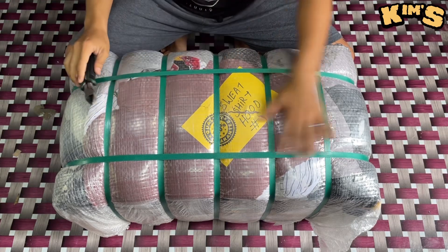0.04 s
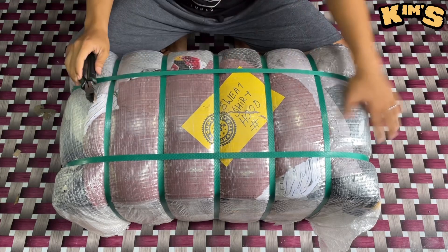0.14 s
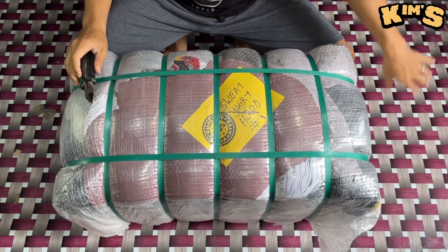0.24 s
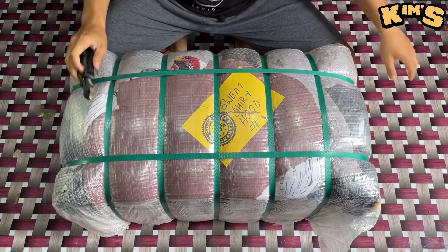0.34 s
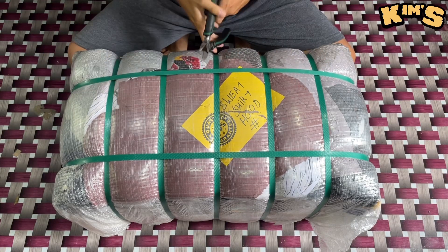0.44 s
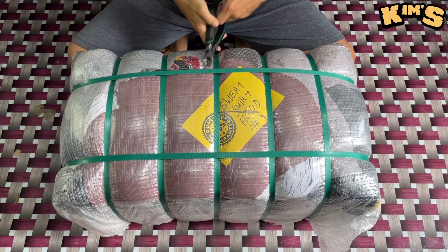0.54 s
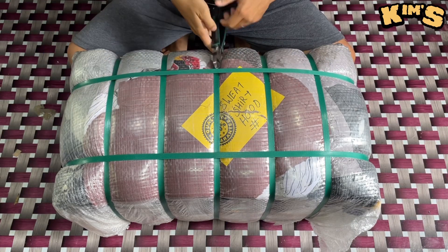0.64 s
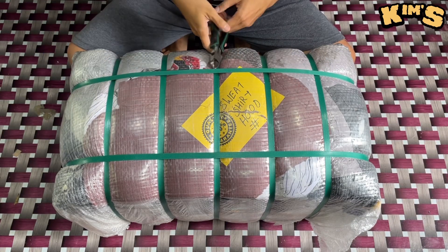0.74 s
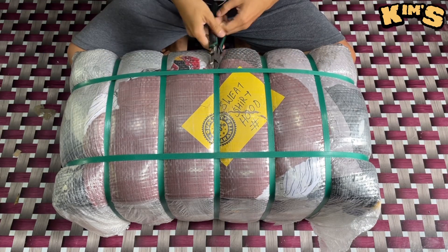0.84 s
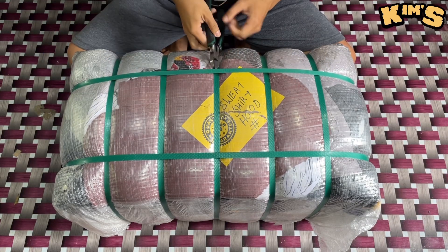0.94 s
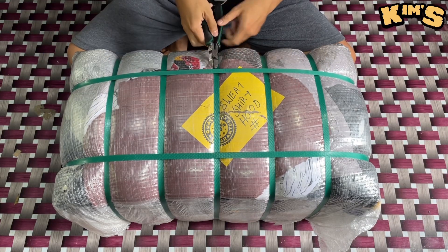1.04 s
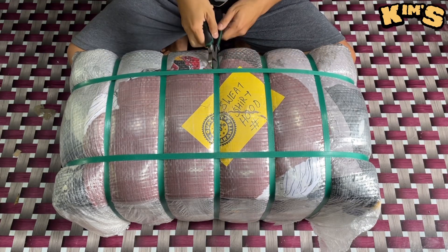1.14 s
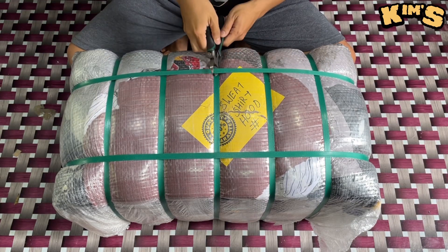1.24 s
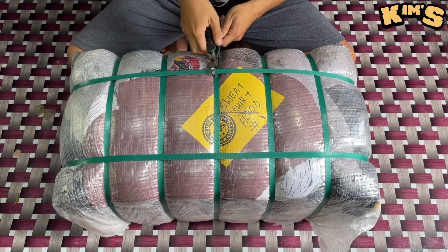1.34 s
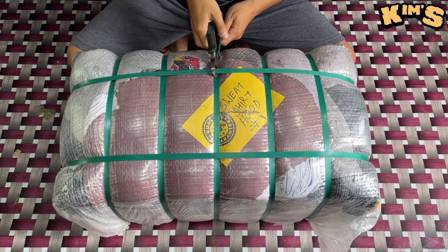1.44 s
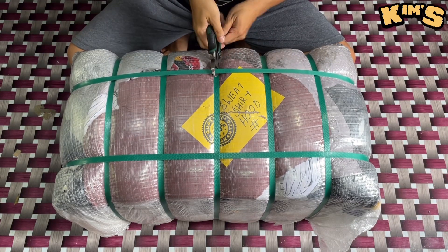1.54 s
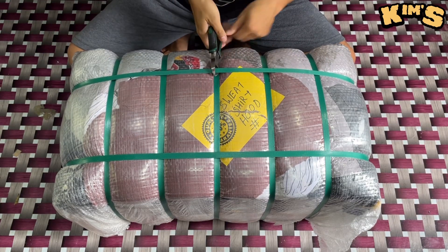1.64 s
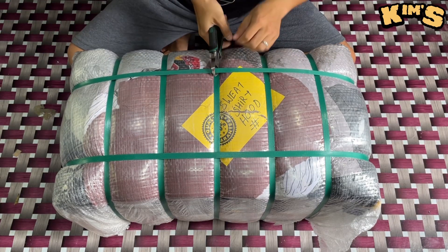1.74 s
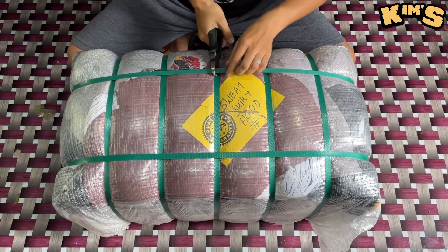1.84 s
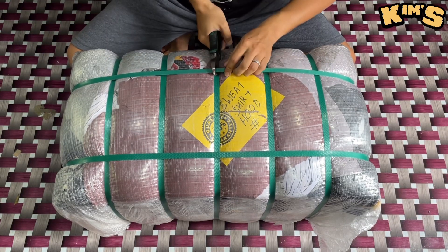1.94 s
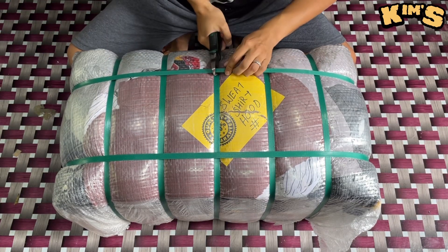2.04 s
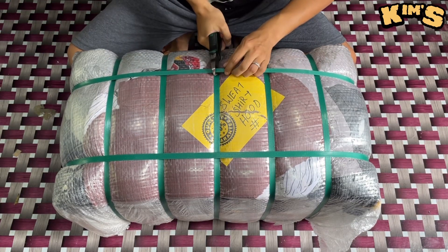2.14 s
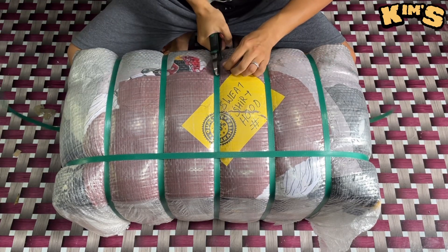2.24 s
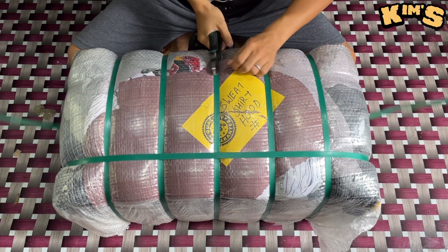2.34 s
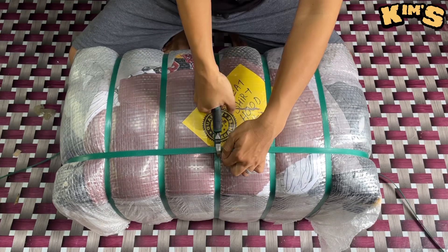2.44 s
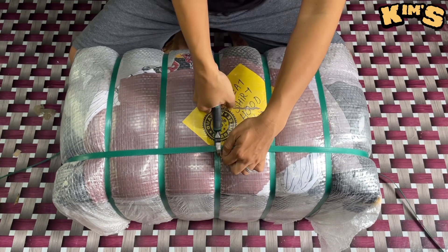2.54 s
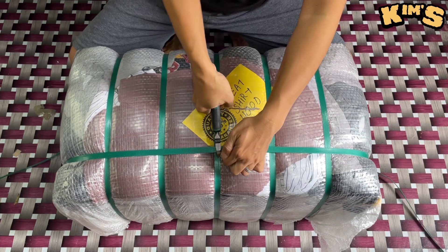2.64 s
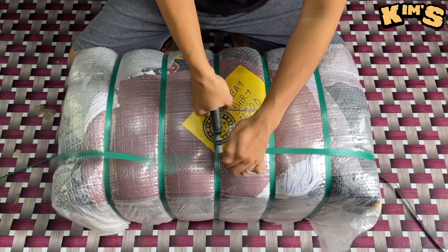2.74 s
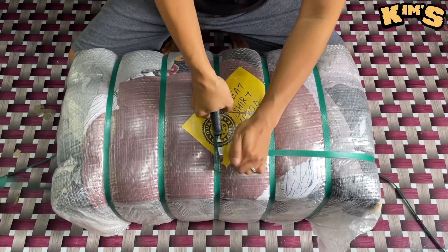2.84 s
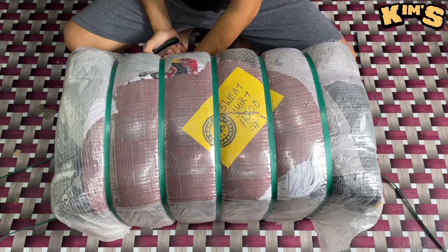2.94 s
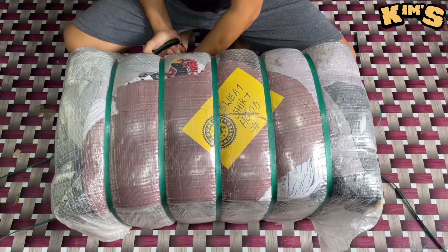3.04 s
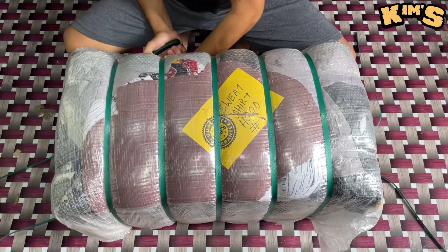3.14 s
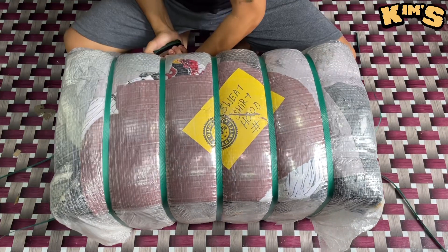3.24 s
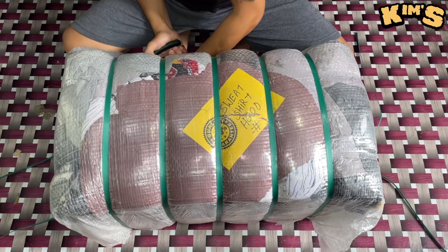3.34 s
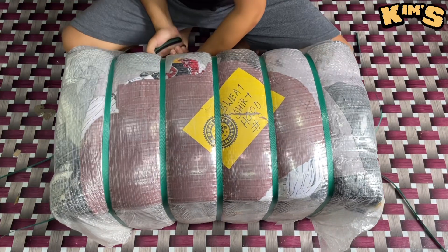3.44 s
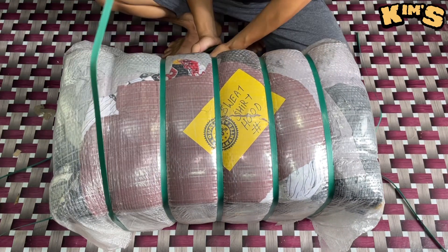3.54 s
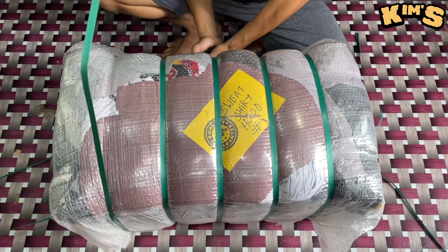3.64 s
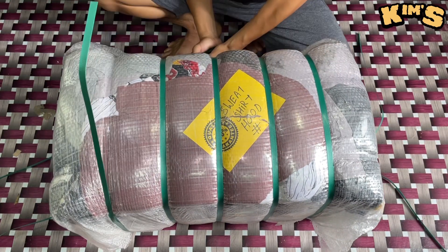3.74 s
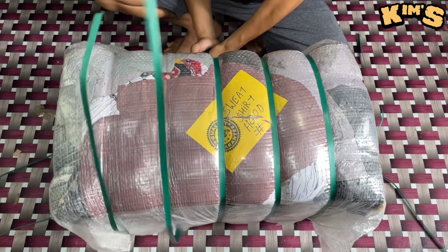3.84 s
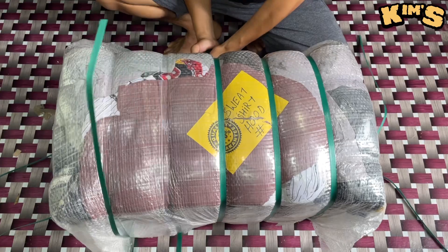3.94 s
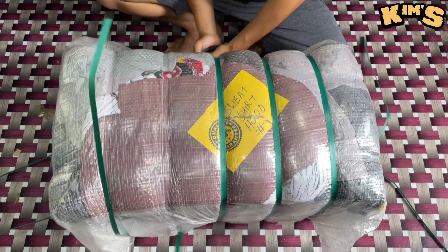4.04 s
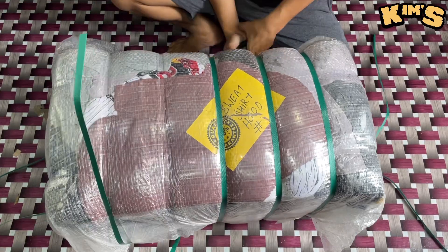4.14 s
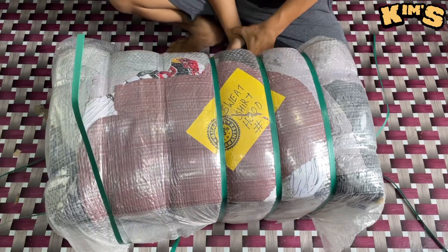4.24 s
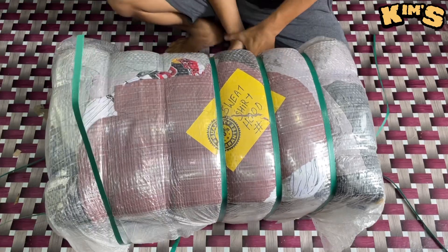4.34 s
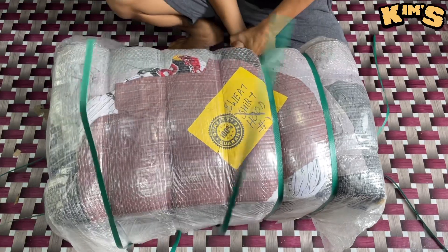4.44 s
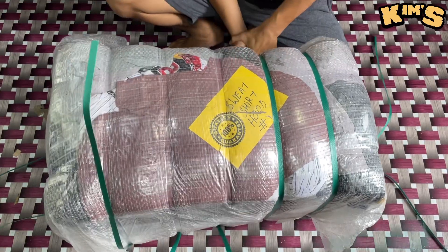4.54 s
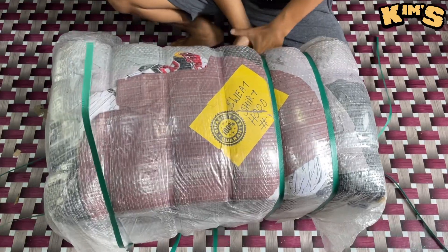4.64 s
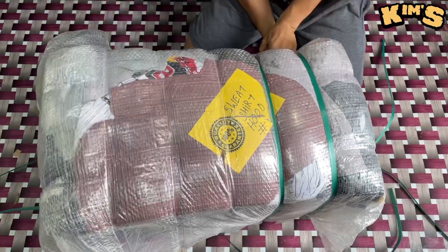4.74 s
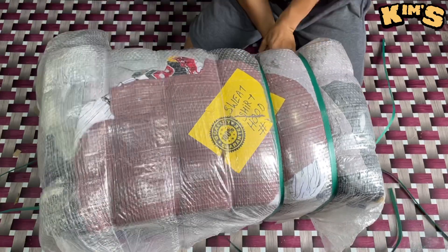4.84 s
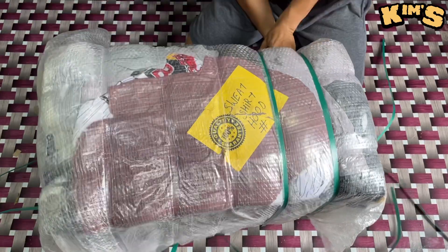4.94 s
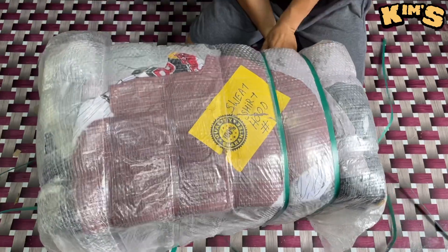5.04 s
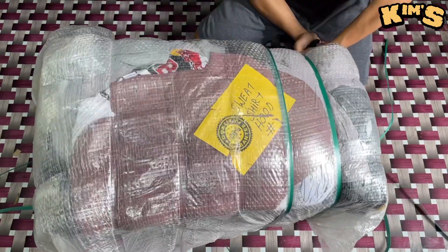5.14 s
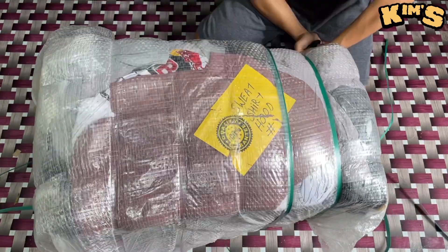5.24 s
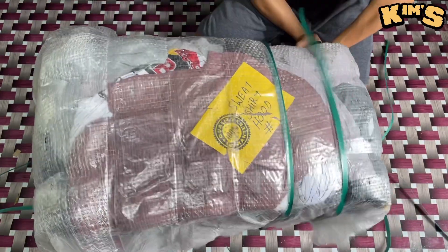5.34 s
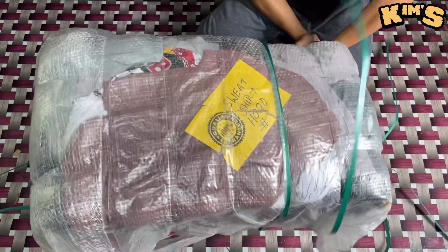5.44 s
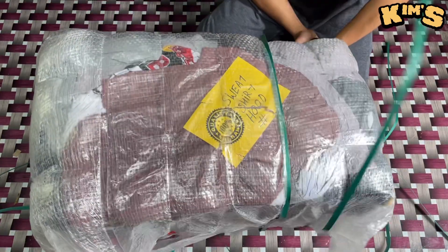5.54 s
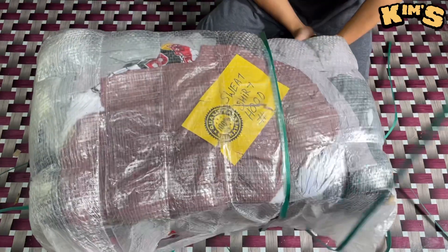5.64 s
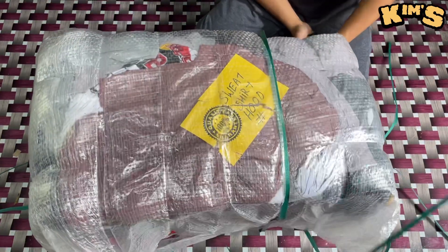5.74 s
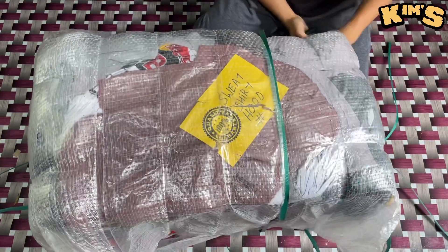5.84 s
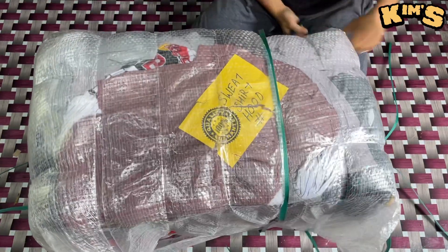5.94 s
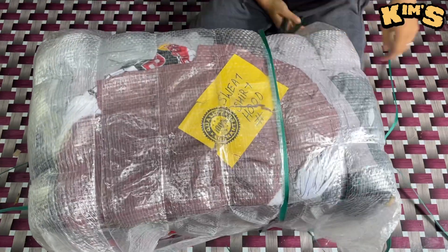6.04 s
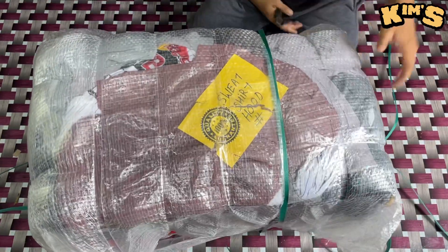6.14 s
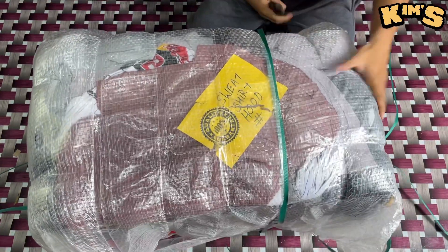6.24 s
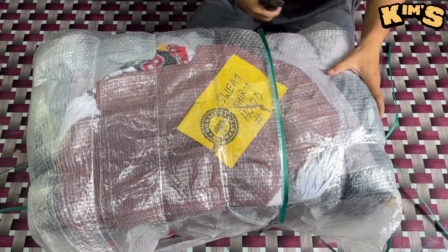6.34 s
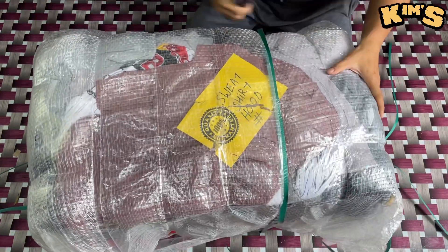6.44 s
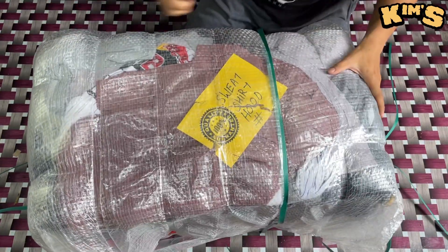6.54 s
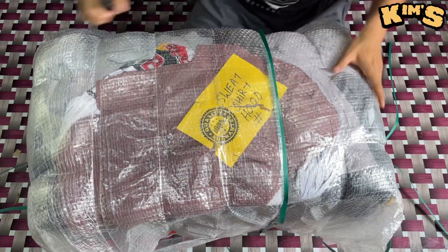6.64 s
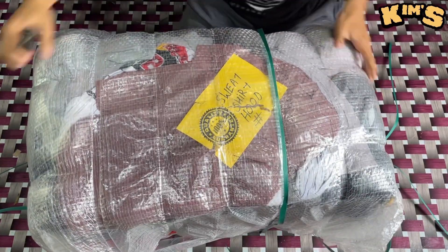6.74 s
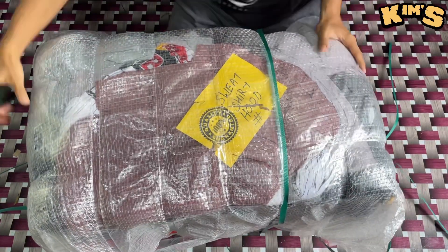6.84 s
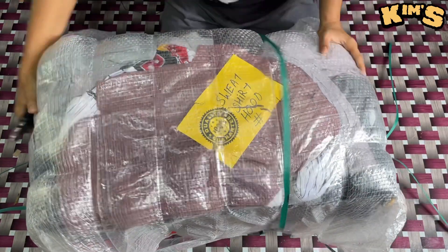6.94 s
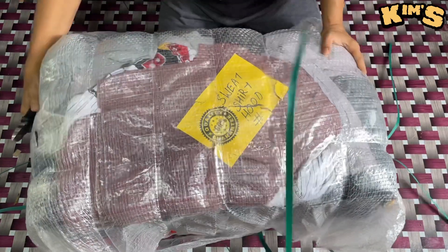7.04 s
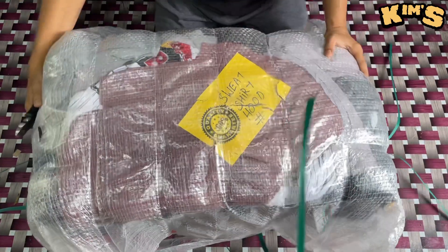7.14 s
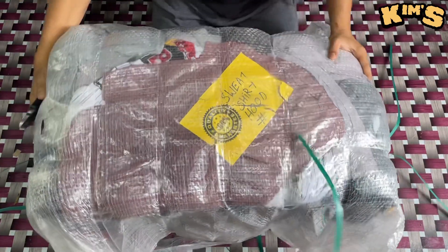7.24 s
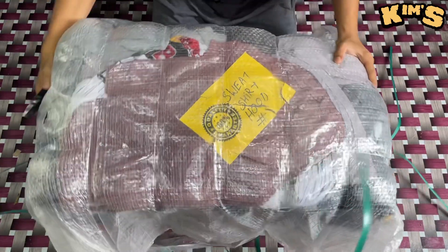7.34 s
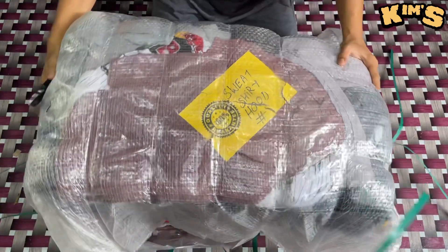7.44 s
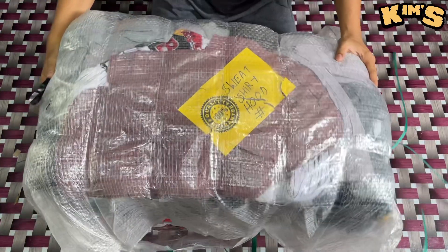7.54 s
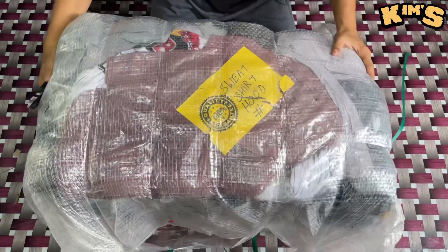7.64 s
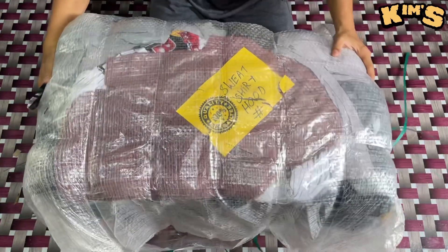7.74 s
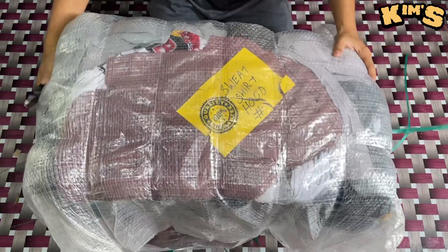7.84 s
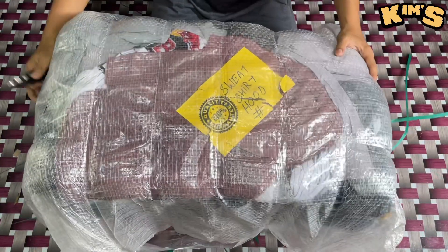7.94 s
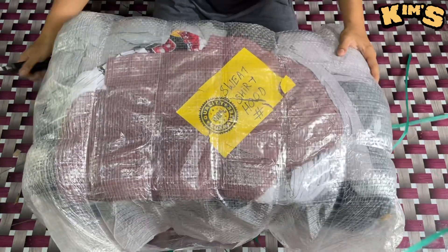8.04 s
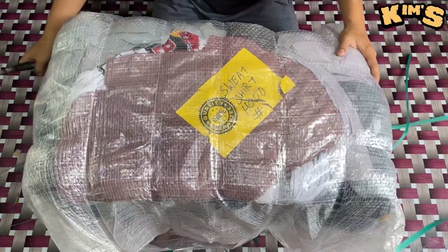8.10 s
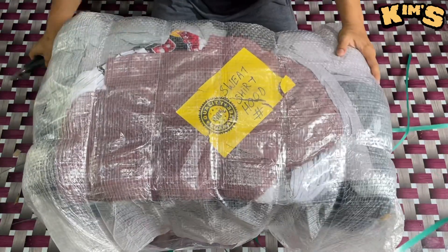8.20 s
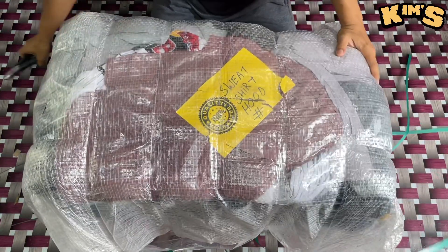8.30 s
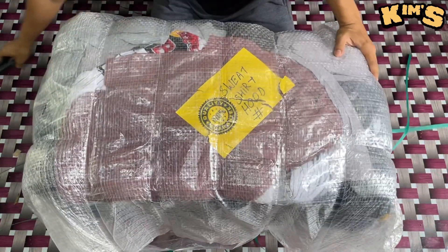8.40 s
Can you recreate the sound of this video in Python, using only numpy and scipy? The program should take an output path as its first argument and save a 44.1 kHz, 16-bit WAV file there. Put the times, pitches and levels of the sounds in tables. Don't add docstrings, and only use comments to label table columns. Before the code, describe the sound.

Close and dry in a small room with very faint room tone. For the first two seconds it is nearly quiet: a faint strap groan at the start, plier clicks and light knocks around 0.6, a creaky groan at 0.75, a brief one at 1.15, sharper clicks near 2.0. At 2.17 the first taut plastic strap snaps, a violent overloaded crack with a thump of the bale and rattling plastic spray. More snaps follow at 2.75 (weaker), 3.16, 3.8 (duller, long hollow tail), 4.36 (short), 4.9 and 5.32 (strong air push), with clicks, wrap rustle and tiny humming strap ends between. From 5.4 to 7.5 loose wrap is pulled, crackling, popping and crinkling densely, with hand knocks, short strap whisks at 5.9 and 6.1, low air buffeting near 6.1 and a livelier tug around 7.2. After 7.5 it drops abruptly to sparse, tiny crinkles until about 8.4.

```python
import sys
import numpy as np
from scipy import signal
from scipy.fft import rfft, irfft
from scipy.io import wavfile
from scipy.ndimage import uniform_filter1d

SR = 44100
rng = np.random.default_rng(int(sys.argv[2]) if len(sys.argv) > 2 else 0)


def voltage_ratio(decibels):
    exponent = np.asarray(decibels, float) / 20
    return 10 ** exponent


def transcribe(signal):
    frames = np.atleast_2d(signal).T
    limited = np.clip(frames, -1, 1)
    pcm = np.round(limited * 32767).astype(np.int16)
    wavfile.write(sys.argv[1], SR, pcm)


N = 373527

# start_s, crack_ms, thump_db, air_push_fs (before the stops), tail_db
CUTS = [
    (2.173, 1.48, 13, 1.22, -19),
    (2.7543, 0.87, -5.5, 0.28, -15),
    (3.1601, 0.98, 11, 1.55, -16),
    (3.7950, 0.66, 3.5, 0.17, -12),
    (4.358, 0.37, 10.5, 0.44, -10.5),
    (4.9018, 0.68, 9.5, 1.18, -11),
    (5.3180, 1.45, 10, 2.5, -16.5),
]
TAIL_ENDS_S = [2.443, 2.96, 3.548, 4.145, 4.85, 5.125, 5.77]
# thump_pitch_factor, thump_t60_s, crack_1500hz_db, crack_3500hz_db, crack_11000hz_db
STRAP_CRACKS = [(.95, 0.026, -4, -2.5, -3.5), (1.1, .025, -5, -2, -1), (1.03, 0.026, -5, -11.5, -8),
                (1.02, .025, -4, -0.5, -8.5), (1.01, .024, 0, -4.5, 0), (1.2, .022, -13, 0.5, -3.5),
                (0.74, .03, 5, 4.5, -2.5)]
# low_hollow_db, mid_hollow_db, high_hollow_db, spray_db, slowness_factor
PLACES = [(-2, -2, -6, .1, 1.11), (-4.9, -3.5, -3, 0.013, 0.99), (0, -2, 0.5, .1, 1.05),
          (3.8, -4, 1.1, 1.5, 0.98), (-2.5, -1, -2, -0.3, 0.92), (1, -2, -13, -.1, 0.91),
          (-7, -4, -0.1, -0.18, 1.02)]
# mode_hz, width_hz, level_db
BALE_MODES = [(217, 14, 8), (278, 61, 5), (327, 96, -3), (425, 78, -1.5), (435, 41, 8.5), (580, 80, 0),
              (695, 37, -6), (1000, 24, -6.5), (1400, 400, -34.5)]
HOLLOW_EDGES_HZ = [350, 620]
# freq_hz, density_db
SPRAY_SPECTRUM = [(530, -27), (900, -0.5), (968, -0.5), (1050, -10), (1920, -24.5), (6210, -18.5),
                  (6930, -20), (12800, -14), (16100, -26), (16700, -61.5)]
CRACK_DB, CRACK_PER_THUMP, CRACK_DB_PER_OCTAVE = 13.5, 0.13, -8
THUMP_HZ, SLACK_HZ_PER_CUT = 241, 2.5
SPRAY_DB, SPRAY_PER_TAIL = -18.5, 0.63

# middle_s, length_s, pitch_hz, level_db
TWANGS = [(.63, .05, 880, -66), (1.286, 0.059, 552, -64), (1.284, .04, 955, -66), (1.406, 0.033, 430, -55),
          (1.398, .02, 1150, -56), (2.249, 0.033, 450, -42), (2.295, 0.041, 515, -44),
          (2.33, 0.0207, 450, -48), (2.354, 0.0197, 600, -46), (2.758, 0.014, 890, -24),
          (3.18, .02, 436, -22), (3.216, 0.036, 595, -32), (3.234, .03, 775, -36), (3.811, .025, 462, -21),
          (3.842, .03, 752, -27.5), (3.87, .025, 852, -29.5), (4.378, 0.017, 544, -25),
          (4.39, .03, 812, -23.5), (4.415, 0.015, 520, -36), (4.461, .03, 756, -38),
          (4.92, 0.0201, 567, -21.5), (4.949, 0.032, 612, -27), (4.964, 0.023, 580, -25),
          (5.327, .015, 540, -27), (5.354, 0.023, 683, -32), (5.38, 0.035, 598, -38),
          (5.122, 0.017, 810, -43), (5.292, 0.014, 797, -47.5), (7.183, 0.037, 517, -38),
          (6.806, .03, 710, -55)]
# peak_s, swell_s, sink_s, hiss_db, rasp_db
WHISKS = [
    (5.92, 0.025, 0.068, -35, -31.5),
    (6.108, 0.035, 0.012, -37.5, -39),
]
# freq_hz, density_db
RASP_SPECTRUM = [(500, -24), (900, 5), (1300, -10), (1800, 4), (2400, -3), (3200, 2.5), (4200, -14),
                 (6000, -40)]
WHISK_EDGE_DB = -12

# start_s, length_s, slips_per_s, level_db
GROANS = [
    (.005, 0.11, 120, -57.5),
    (.735, 0.067, 130, -46.5),
    (1.153, 0.029, 89, -54.5),
]
# mode_hz, width_hz, level_db
STRAP_MODES = [(160, 8, 2.5), (236.6, 13, 12), (264, 61, 1.5), (310, 27, -0.5), (513, 73, -24),
               (596, 73, -9.5), (907, 27, -1), (1150, 50, 2)]

# start_s, peak_db, pitch_hz, bright_rel_db
CLICKS = [(0.591, -22, 4900, -30), (0.672, -27, 5700, -28), (0.841, -38, 1020, -21),
          (1.729, -35, 1050, -22), (1.903, -54, 996, 8), (2.022, -20, 1681, -2),
          (2.109, -43.5, 2457, -12.5), (2.048, -25, 1700, -31), (2.382, -29.5, 1340, -15),
          (2.545, -39.5, 6200, -19), (2.558, -35, 3940, -8.5), (2.579, -38.5, 1096, -17),
          (2.594, -32.5, 2700, -27), (2.69, -41.5, 1735, -25), (2.704, -39.5, 3026, -15),
          (3.072, -30.5, 1041, -21.5), (3.408, -17, 850, -39), (3.473, -32, 830, -5),
          (3.515, -28, 1050, -5), (3.657, -52.5, 5860, 4), (4.112, -31.5, 1200, -21), (4.137, -35, 825, -9),
          (4.538, -28.5, 2300, -3.5), (4.556, -41.5, 790, 12), (4.57, -16, 875, -4.5),
          (4.727, -33.5, 2640, 4), (4.774, -34, 2540, 1), (4.863, -50.5, 3506, 14.5),
          (5.18, -31.5, 1704, 5.5), (5.208, -32, 1750, -20)]
# start_s, peak_db, pitch_hz, bright_rel_db
KNOCKS = [(0.615, -34, 888, -22), (0.684, -40, 5000, -14), (0.736, -41, 1600, -20), (0.758, -45, 2600, -17),
          (1.156, -45, 1500, -18), (1.239, -39.5, 1230, -10), (1.403, -45.5, 860, 3),
          (1.84, -39, 1030, -13), (1.856, -34, 1040, -12), (1.98, -53.5, 1340, -19),
          (2.401, -30.5, 1000, -31), (2.283, -37, 3000, -10), (2.315, -43, 2390, -13),
          (2.326, -40, 3200, -8), (2.42, -43, 3500, -3), (5.323, -19, 990, -41), (5.333, -18, 2600, -14),
          (5.428, -34, 6000, -6), (5.436, -32, 6000, -10), (5.302, -48, 1500, -14), (5.078, -33, 1510, -12),
          (5.138, -40, 800, -23), (2.531, -33.5, 846, -27.5), (2.645, -53, 3500, -9),
          (2.666, -50.5, 2500, -7), (2.986, -53, 912, -27.5), (3.008, -49, 1400, -11),
          (3.328, -45, 823, -20), (3.809, -2.5, 963, -5.5), (3.886, -26.5, 827, -9), (4.918, -8, 910, 5.5),
          (5.281, -33.5, 875, 5.5), (6.147, -32, 802, -4), (6.29, -25.5, 3050, -29),
          (6.529, -23, 822, -3.5), (6.722, -30, 1220, -10), (6.853, -23.5, 1110, -20),
          (7.119, -38, 1020, 10), (7.152, -21, 1354, -10), (7.417, -29, 2190, -4)]
# start_s, peak_db, pitch_hz, bright_rel_db
POPS = [(5.535, -28, 1945, 0), (5.575, -28, 1130, -6), (5.611, -30, 802, 5.5), (5.71, -21, 920, -30),
        (5.724, -32, 5500, -24), (5.767, -25, 2360, -16), (6.029, -30, 950, -13), (6.179, -23, 726, -4),
        (6.382, -22.5, 795, -8), (6.423, -29, 1810, -1), (6.46, -27, 6000, -2), (6.503, -22, 2660, -5),
        (6.577, -40, 845, -19), (6.907, -29, 1360, 5), (7.061, -28.5, 3050, -4), (7.085, -35, 1260, 8.5),
        (7.198, -17, 5900, -20), (7.267, -30.5, 1650, 3), (7.343, -46, 6000, -14),
        (7.486, -23.5, 1116, -16), (7.504, -32.5, 2499, -20), (7.754, -43.5, 5500, 0),
        (7.917, -36.5, 3140, -6), (7.934, -46, 2930, 9.5), (7.943, -49, 4000, -3),
        (8.018, -37.5, 3430, -12), (8.047, -43.5, 4000, -0.5), (8.255, -44, 6000, 8.5),
        (8.437, -46, 5460, -11)]
# start_s, peak_db, pitch_hz, bright_rel_db
CRINKLES = [(0.865, -45, 1930, -14), (1.572, -46, 1510, -14), (5.0392, -31, 1940, -14.5),
            (5.416, -28, 1680, -7), (5.4486, -32.5, 1630, -6), (5.4738, -26.5, 1560, -12),
            (5.5867, -26, 2380, -14), (5.638, -32, 2010, -12), (5.7219, -28, 2320, -11),
            (5.7393, -32, 6410, -14), (5.754, -26.5, 2270, -14), (5.7826, -34, 1440, -19),
            (5.794, -34, 2690, -12), (5.8863, -39, 1820, -12), (5.908, -23.5, 1800, -16),
            (6.0006, -28, 2430, -14), (6.0531, -29, 1700, -19), (6.0819, -28, 2950, -14),
            (6.2104, -40, 1640, -14), (6.2362, -39, 1520, -14), (6.2484, -34, 1350, -2),
            (6.2747, -32, 1420, -9), (6.365, -36, 1390, -22), (6.3935, -37, 1860, -14),
            (6.4314, -30, 4440, -11), (6.4944, -30, 2640, -17), (6.5112, -31, 2740, -16),
            (6.5296, -28, 2730, -16), (6.551, -26, 2350, -14), (6.5992, -29, 1620, -20),
            (6.6124, -28, 5320, -16), (6.63, -35, 2020, -14), (6.6708, -31.5, 1720, -4),
            (6.7451, -37, 2020, -12), (6.7514, -29, 2690, -18), (6.7984, -37, 1300, -14),
            (6.8189, -29, 1350, -7), (6.9294, -43, 1340, -14), (6.9455, -26.5, 1950, -17),
            (7.0063, -35, 1440, -11), (7.0384, -28.5, 2640, -12), (7.0688, -28, 1400, -11),
            (7.1785, -23, 1370, -18), (7.223, -24, 2270, -14), (7.2323, -29, 2660, -14),
            (7.2736, -24, 2500, -11), (7.2917, -29, 1780, -12), (7.3277, -34, 2710, -14),
            (7.3671, -37, 2380, -14), (7.396, -36, 2360, -14)]
CLICK_DULL_DB, KNOCK_DULL_DB, POP_DULL_DB, CRINKLE_DULL_DB = -24.5, -8, -32, -18

# peak_s, swell_s, sink_s, level_db, crispness_db
SHIFTS = [(.03, 0.11, 0.15, -59.5, 5), (.62, 0.027, 0.075, -59.5, -8), (1.26, 0.15, 0.059, -65, -9),
          (1.405, 0.064, 0.034, -67, 1), (1.86, 0.28, 0.13, -66.5, -1.7), (2.58, 0.16, 0.17, -59, -0.5),
          (3.1, 0.043, 0.027, -68, -2.5), (3.539, 0.21, .008, -46.5, 0), (4.008, 0.06, 0.13, -52, 2.5),
          (4.24, .09, 0.16, -65.5, -0.6), (4.55, 0.026, 0.19, -52, 2), (4.77, 0.017, 0.12, -59, 2),
          (5.01, 0.083, .11, -47.5, 6), (5.18, 0.11, 0.13, -58, -1.5)]
# peak_s, swell_s, sink_s, level_db, crispness_db
PULLS = [(5.55, 0.034, 0.14, -46, 2.5), (5.8, 0.15, 0.13, -44, 1.5), (6.02, 0.15, 0.06, -46, 0.5),
         (6.17, 0.059, 0.051, -49, 2.5), (6.39, 0.017, 0.027, -48.5, 4), (6.53, 0.026, 0.036, -45.5, -1.5),
         (6.63, 0.043, 0.11, -53.5, 2), (6.85, 0.12, 0.12, -44, -2.5), (7.16, 0.056, 0.052, -38, 2),
         (7.27, .02, 0.071, -52, -4), (7.47, 0.29, .035, -51, 0.3), (7.54, .03, 0.29, -62, 1.5),
         (7.95, 0.13, 0.22, -62, -4), (8.4, 0.18, .2, -62, 0.3)]
# freq_hz, density_db
CRACKLE_SPECTRUM = [(2350, -30), (4000, -2), (6040, -1.5), (13200, -3), (15700, -13), (16300, -22.5),
                    (16700, -50.5)]
# freq_hz, density_db
CREASE_SPECTRUM = [(530, -29), (900, 0.5), (1470, -0.5), (1780, -3), (2960, -2.5), (4000, -15), (5200, -35),
                   (8800, -120)]
# freq_hz, density_db
RUB_SPECTRUM = [(76, -42), (130, -2), (290, 4), (441, -3), (511, -1), (900, -3), (1170, -29), (1980, -120)]
REST_DB, HELD_DB, MOVE_DB = (-77, -74, -72), (-56.5, -57, -58.5), (-1, 0.5, -2)
SETTLE_DB, SETTLE_DB_PER_S = (-38.5, -38, -26.5), (47.5, 48, 89.5)
HELD_S = (5.35, 7.512)
EDGE_DB, LET_GO_S, PULL_LET_GO_S = -7.5, 0.011, 0.21

# start_s, level_db, pitch_hz
BUMPS = [
    (.405, -48, 90),
    (2.415, -45, 100),
    (3.54, -43, 201),
    (4.14, -49, 150),
    (4.56, -53, 120),
    (5.98, -42, 111),
    (6.285, -41, 250),
]
# start_s, pressure_fs, rise_s
GUSTS = [(2.755, 0.02, 0.009), (3.162, 0.038, 0.014), (3.8, -0.097, 0.026), (3.88, 0.034, 0.08),
         (4.362, -0.17, 0.026), (4.431, 0.088, 0.065), (4.902, 0.11, 0.031), (5.321, 0.19, 0.014),
         (5.37, -0.064, 0.071), (5.962, 0.084, 0.087), (6.069, -0.073, 0.035), (6.169, 0.053, 0.057)]
# time_s, level_db
DRAUGHT_LEVEL = [(0.0, -53), (1.41, -51.5), (1.51, -48.5), (2.19, -53), (3.28, -43.5), (4.15, -48.5),
                 (4.39, -43.5), (5.23, -47.5), (5.42, -42.5), (5.87, -42.5), (6.11, -17.5), (6.23, -39.5),
                 (6.72, -35.5), (6.86, -35), (8.47, -52.5)]
# freq_hz, density_db
ROOM_SPECTRUM = [(24, -23.5), (40, 0), (87, -24), (169, -16), (452, -16), (787, -18.5), (1410, -21.5),
                 (4610, -35.5), (12300, -39.5), (15100, -40.5), (16700, -57)]
ROOM_DB = -64.5


def cut(order, crack_ms, thump_db, push, tail_db, lasts_s):
    t = np.arange(SR // 2) / SR
    thump_factor, thump_t60_s, *crack_dbs = STRAP_CRACKS[order]
    crack_db = CRACK_DB + CRACK_PER_THUMP * thump_db + CRACK_DB_PER_OCTAVE * np.log2(crack_ms)
    thump_hz = (THUMP_HZ - SLACK_HZ_PER_CUT * order) * thump_factor
    drive = crack(t, crack_db, crack_ms, crack_dbs)
    drive -= voltage_ratio(thump_db - 60 * t / thump_t60_s) * np.sin(2 * np.pi * thump_hz * t)
    drive += push * (1 - np.exp(-t / .002)) * np.exp(-(t / .009) ** 2)
    stopped = np.clip(drive, -.6, .6)
    free = uniform_filter1d((abs(stopped) < .6) * 1., size=8)
    gate = free * (t < lasts_s) * (1 - np.exp(-t / 0.0057))
    return membrane(stopped) + gate * aftermath(t, tail_db, PLACES[order])


def crack(t, level_db, crack_ms, crack_dbs):
    points = [(600, -16), (7000, -8), (15000, -16), *zip((1500, 3500, 11000), crack_dbs)]
    noise = colour(rng.standard_normal(len(t)), sorted(points))
    burst = 1 / (1 + (t * 1000 / crack_ms) ** 6)
    return noise * voltage_ratio(level_db) * (burst + voltage_ratio(-31.0 - 60 * t / 0.019))


def membrane(stopped):
    leak = np.exp(-2 * np.pi * 300 / SR)
    drained = signal.lfilter([1, -1], [1, -leak], stopped)
    vent = signal.butter(2, 110, "high", fs=SR, output="sos")
    return 1.6 * signal.sosfilt(vent, drained)


def aftermath(t, tail_db, place):
    *hollow_dbs, spray_offset_db, slowness = place
    modes = []
    for hz, width, db in BALE_MODES:
        band_db = hollow_dbs[np.searchsorted(HOLLOW_EDGES_HZ, hz)]
        modes.append((hz * rng.uniform(.94, 1.06), width, db + band_db + 1.1 * rng.standard_normal()))
    slow_t = t / slowness
    low = evened(ring(rng.standard_normal(len(t)), modes)) * voltage_ratio(tail_db)
    low *= voltage_ratio(-60 * slow_t / 0.13) + voltage_ratio(-14.0 - 60 * slow_t / 0.37)

    burst = .8 * rng.standard_normal(len(t)) + .4 * grains(len(t), per_s=3000, spread_db=3)
    spray_db = SPRAY_DB + SPRAY_PER_TAIL * tail_db + spray_offset_db
    high = colour(burst, SPRAY_SPECTRUM) * voltage_ratio(spray_db)
    high *= voltage_ratio(-60 * t / 0.2) + voltage_ratio(-11 - 60 * t / 0.24)
    return low * voltage_ratio(2.0 * lumps(burst)) + high * voltage_ratio(1.5 * lumps(burst[::-1]))


def lumps(x):
    return evened(uniform_filter1d(uniform_filter1d(x, size=250), size=250))


def twang(middle_s, length_s, hz, db):
    u = np.linspace(-1, 1, num=round(length_s * SR))
    wander = evened(uniform_filter1d(rng.standard_normal(SR // 10), size=120))[:len(u)]
    pitch = hz * (1 - .04 * u + .12 * wander)
    hum = np.sin(2 * np.pi * np.cumsum(pitch) / SR)
    return middle_s - length_s / 2, voltage_ratio(db) * np.cos(np.pi * u / 2) ** 2 * hum


def whisk(peak_s, swell_s, sink_s, hiss_db, rasp_db):
    t = np.arange(peak_s - .1, peak_s + .12, 1 / SR)
    hiss = colour(rng.standard_normal(len(t)), CRACKLE_SPECTRUM) * voltage_ratio(hiss_db)
    rasp = colour(grains(len(t), per_s=4000, spread_db=2.0), RASP_SPECTRUM) * voltage_ratio(rasp_db)
    return t[0], (hiss + rasp) * voltage_ratio(stroke(t, peak_s, swell_s, sink_s, LET_GO_S, WHISK_EDGE_DB))


def groan(length_s, slips_per_s, db):
    slips = np.zeros(round(.25 * SR))
    step, size = rng.random((2, 40))
    at_s = np.cumsum(.6 + 0.39 * step) / slips_per_s
    at_s = at_s[at_s - at_s[0] < length_s] - at_s[0]
    slips[(at_s * SR).astype(int)] = .5 + .5 * size[:len(at_s)]
    fade = np.exp(-(np.arange(len(slips)) / (1.1 * length_s * SR)) ** 2)
    drive = slips + 0.019 * rng.standard_normal(len(slips)) * fade
    soft = np.convolve(drive, np.hanning(60))[:len(slips)]
    sound = ring(soft, STRAP_MODES) + ring(drive, [(1700, 1200, -8)])
    sound = signal.sosfilt(signal.butter(3, 150, "high", fs=SR, output="sos"), sound)
    return voltage_ratio(db + 12) * sound / abs(sound).max()


def tick(peak_db, hz, dull_db, bright_db):
    t = np.arange(2000) / SR
    noise = rng.standard_normal((3, len(t)))
    fade = voltage_ratio(-60 * t / 0.0056) + voltage_ratio(-17 - 60 * t / .04)
    pop = ring(noise[0], [(hz, 0.37 * hz, 0)]) * fade
    pop = 1.19 * pop / abs(pop).max()
    spit = evened(ring(noise[1], [(9500, 35000, 0)])) * voltage_ratio(bright_db + 3.0) * fade
    knock = evened(ring(noise[2], [(454, 230, 0)])) * voltage_ratio(dull_db - 0.5 - 60 * t / 0.069)
    return voltage_ratio(peak_db - 7.0) * (pop + spit + knock)


def loose():
    out = np.zeros(N)
    for s, peak_db, hz, bright_db in CRINKLES:
        add(out, s, tick(peak_db, hz, CRINKLE_DULL_DB, bright_db))
    for row in TWANGS:
        add(out, *twang(*row))
    return out


def wrap():
    t = np.arange(N) / SR
    steps = np.arange(0, N, 64) / SR
    clumps = uniform_filter1d(uniform_filter1d(rng.standard_normal((4, N)), 220), 220)
    clumps = [evened(1.2 * clumps[0] + own) for own in clumps[1:]]

    creases = np.zeros(N)
    for hz in np.geomspace(500, 14000, num=26):
        popping = grains(N, per_s=70, spread_db=2.5, largest=3)
        narrow = ring(popping, [(hz, 0.15 * hz, 0)])
        creases += evened(ring(narrow, [(hz, 0.34 * hz, 0)])) * np.sqrt(hz)
    creases = evened(creases)

    fine = .7 * grains(N, per_s=8000, spread_db=2.2) + .45 * creases
    stiff = .7 * grains(N, per_s=5000, spread_db=2.2) + .6 * creases
    dull = .7 * rng.standard_normal(N) + .6 * creases
    parts = (colour(fine * voltage_ratio(2.2 * clumps[0]), CRACKLE_SPECTRUM),
             colour(stiff * voltage_ratio(2.5 * clumps[1]), CREASE_SPECTRUM),
             colour(dull * voltage_ratio(2.2 * clumps[2]), RUB_SPECTRUM))
    return sum(part * voltage_ratio(-3.5) * np.interp(t, steps, level) for part, level in zip(parts, motion(steps)))


def motion(t):
    held = (t > HELD_S[0]) * (t < HELD_S[1])
    power = voltage_ratio(2 * np.array(REST_DB))[:, None] + np.outer(voltage_ratio(2 * np.array(HELD_DB)), held)
    for (s, *_, tail_db), tail_end_s in zip(CUTS, TAIL_ENDS_S):
        fade_db = np.outer(SETTLE_DB_PER_S, np.maximum(t - s, 0))
        level_db = np.array(SETTLE_DB)[:, None] + tail_db - fade_db
        power = power + voltage_ratio(2 * level_db) * (t > s) * (t < tail_end_s)
    moves = [(*row, LET_GO_S) for row in SHIFTS] + [(*row, PULL_LET_GO_S) for row in PULLS]
    for *timing, db, crisp_db, let_go_s in moves:
        gate = t < HELD_S[1] if HELD_S[0] < timing[0] < HELD_S[1] else 1
        parts_db = db + np.array(MOVE_DB) + crisp_db * np.array([1, 0, -1])
        level_db = parts_db[:, None] + stroke(t, *timing, let_go_s, EDGE_DB)
        power = power + voltage_ratio(2 * level_db) * gate
    return np.sqrt(power)


def stroke(t, peak_s, swell_s, sink_s, let_go_s, edge_db):
    turns_s = peak_s + np.array([-swell_s - let_go_s, -swell_s, 0, sink_s, sink_s + let_go_s])
    level_db = np.interp(t, turns_s, [-40, edge_db, 0, edge_db, -40])
    return np.where(abs(t - peak_s) < 1, level_db, -99)


def bump(db, hz):
    u = np.arange(2000) / SR * 2 * np.pi * hz
    return voltage_ratio(db + 5) * u * (2 - u) * np.exp(-u)


def room(x):
    t = np.arange(SR // 4) / SR
    signs = rng.choice([-1., 1.], len(t))
    taps = signs * (rng.random(len(t)) < .05) * voltage_ratio(-60 * t / 0.45) * (t > .004)
    return signal.oaconvolve(x, taps / np.linalg.norm(taps))[:N]


def air():
    t = np.arange(N) / SR
    points = [(1, -5.5), (4, 10.5), (12, 4.0), (30, -23.0), (70, -43.5), (150, -80.5)]
    draught = colour(rng.standard_normal(N), points)
    draught *= voltage_ratio(np.interp(t, *np.transpose(DRAUGHT_LEVEL)))
    pushes = sum(size * swell(np.maximum(t - s, 0) / rise_s) for s, size, rise_s in GUSTS)
    tone = voltage_ratio(ROOM_DB) * colour(rng.standard_normal(N), ROOM_SPECTRUM)
    return pushes + tone + draught


def swell(u):
    return (u * np.exp(1 - u)) ** 2


def evened(x):
    return x / np.sqrt(np.mean(x ** 2) + 1e-20)


def add(mix, s, sound):
    part = mix[round(s * SR):][:len(sound)]
    part += sound[:len(part)]


def colour(x, points):
    f, db = np.transpose(points)
    hz = np.fft.rfftfreq(len(x), 1 / SR)
    gain = voltage_ratio(np.interp(np.log(hz + 1), np.log(f + 1), db))
    return evened(irfft(rfft(x) * gain, len(x)))


def ring(x, modes):
    out = np.zeros(len(x))
    for hz, width, db in modes:
        r = np.exp(-np.pi * width / SR)
        poles = [1, -2 * r * np.cos(2 * np.pi * hz / SR), r * r]
        out += voltage_ratio(db) * signal.lfilter([1 - r, 0, r - 1], poles, x)
    return out


def grains(n, per_s, spread_db, largest=5):
    size = voltage_ratio(spread_db * np.minimum(rng.exponential(1, n), largest))
    return evened(size * rng.standard_normal(n) * (rng.random(n) < per_s / SR))


def scene():
    small, snaps = np.zeros(N), np.zeros(N)
    for table, dull_db in ((CLICKS, CLICK_DULL_DB), (KNOCKS, KNOCK_DULL_DB), (POPS, POP_DULL_DB)):
        for s, peak_db, hz, bright_db in table:
            add(small, s, tick(peak_db, hz, dull_db, bright_db))
    for table, source in ((GROANS, groan), (BUMPS, bump)):
        for s, *row in table:
            add(small, s, source(*row))
    for order, ((s, *row), tail_end_s) in enumerate(zip(CUTS, TAIL_ENDS_S)):
        add(snaps, s, cut(order, *row, tail_end_s - s))
    for row in WHISKS:
        add(snaps, *whisk(*row))
    return (small + voltage_ratio(-23.0) * room(small) + snaps + wrap() + air() + loose())[None]


def band_limit(x):
    return signal.sosfilt(signal.butter(12, 16850, fs=SR, output="sos"), x)


def record(dry):
    edge = signal.cheby2(10, 50, 16700, fs=SR, output="sos")
    mix = signal.sosfilt(edge, np.clip(dry, -.93, .93))
    return band_limit(mix)


dry = scene()
out = record(dry)
transcribe(out)
```